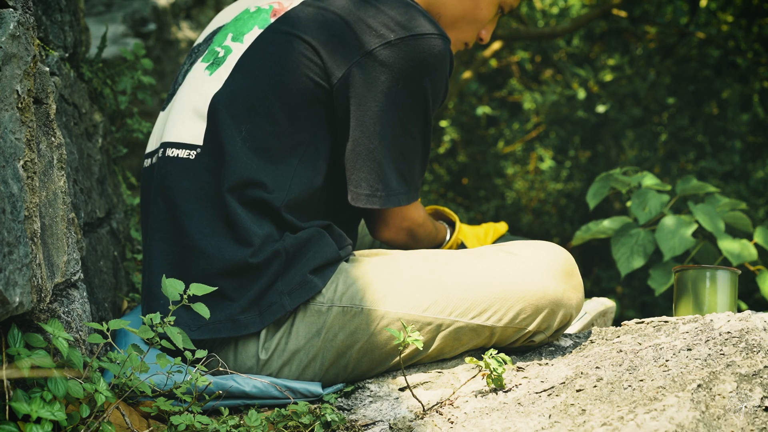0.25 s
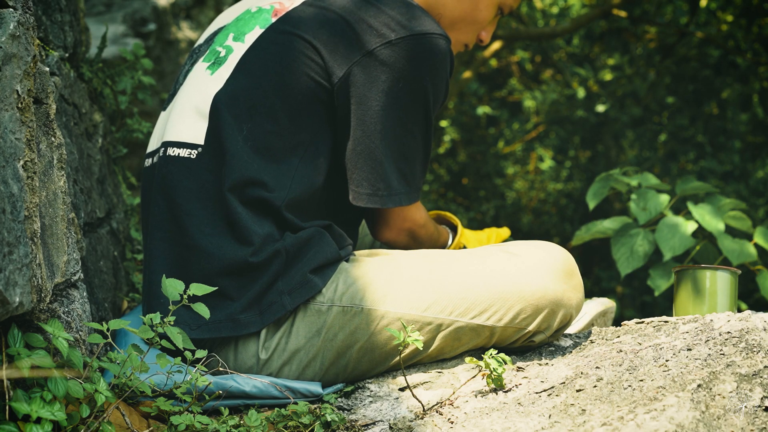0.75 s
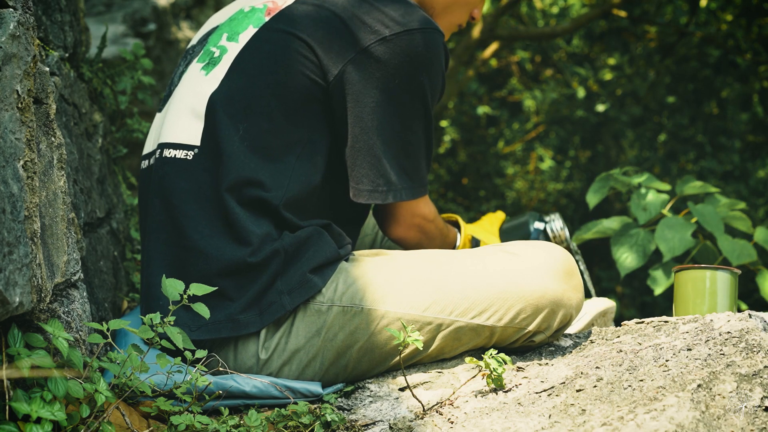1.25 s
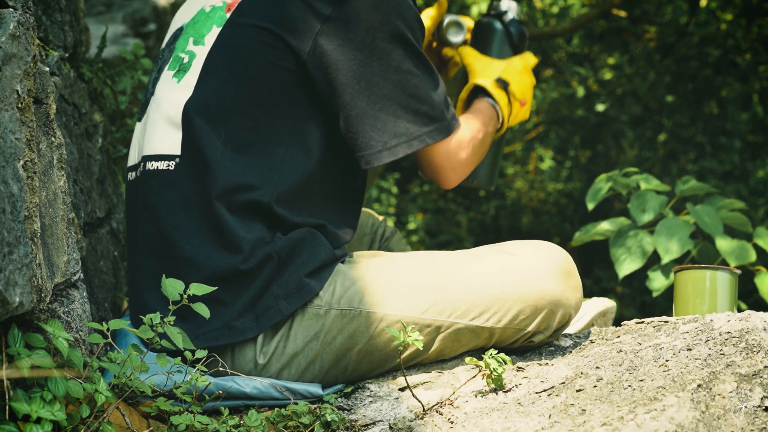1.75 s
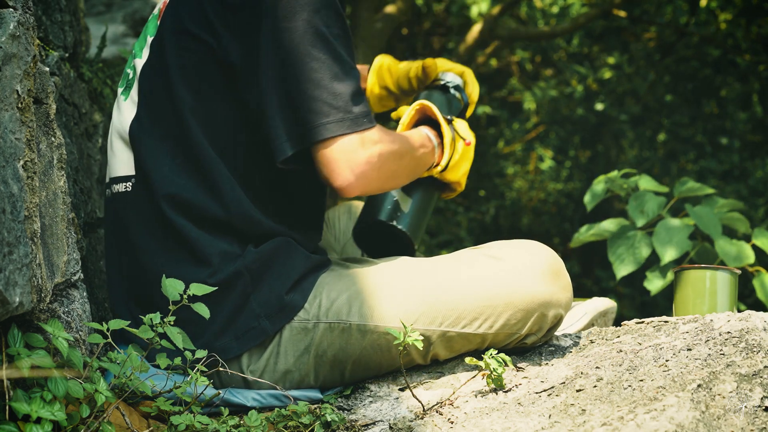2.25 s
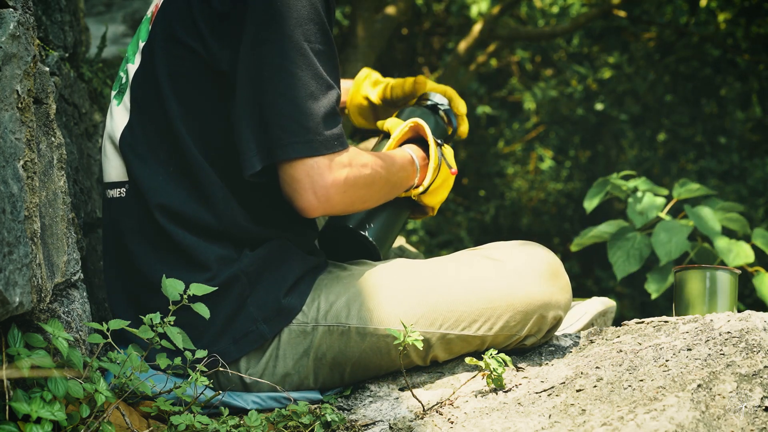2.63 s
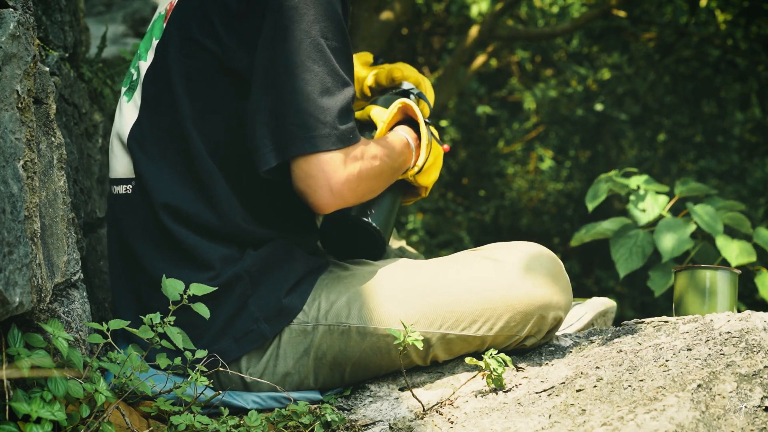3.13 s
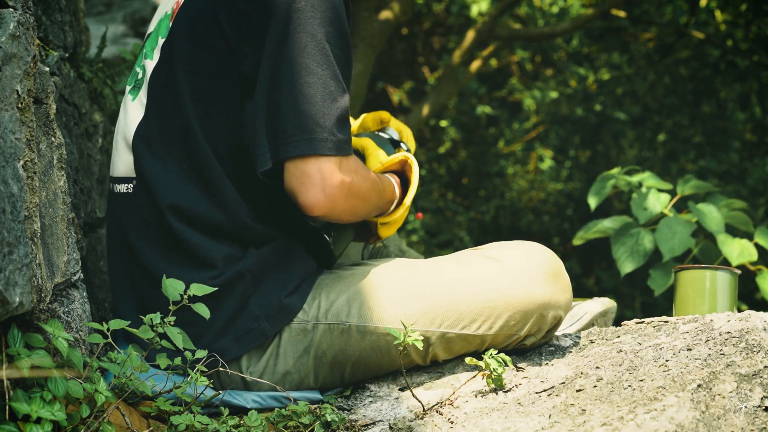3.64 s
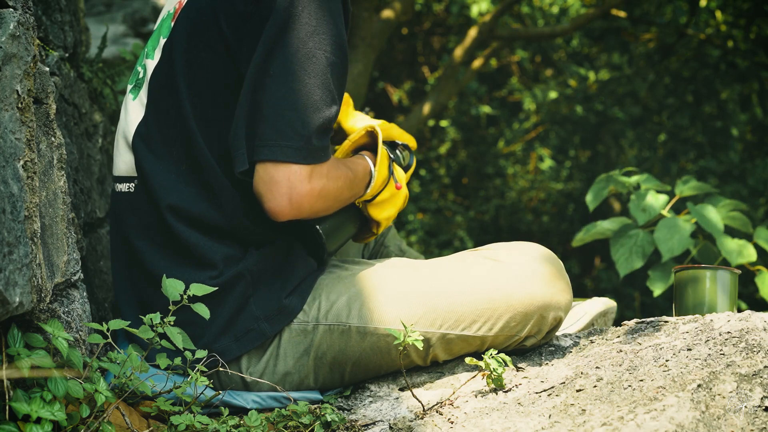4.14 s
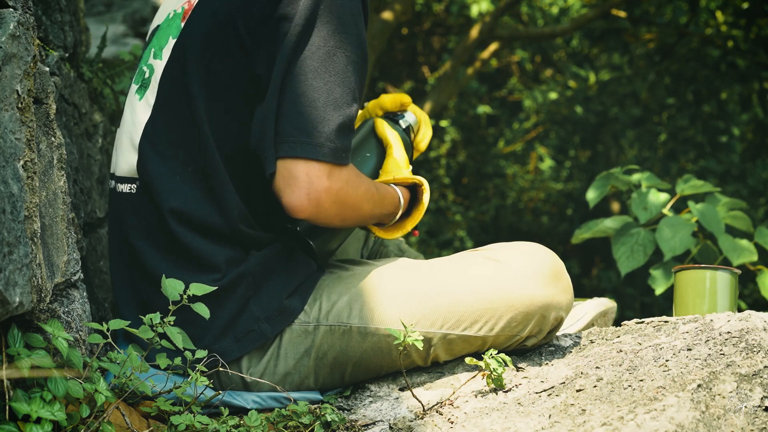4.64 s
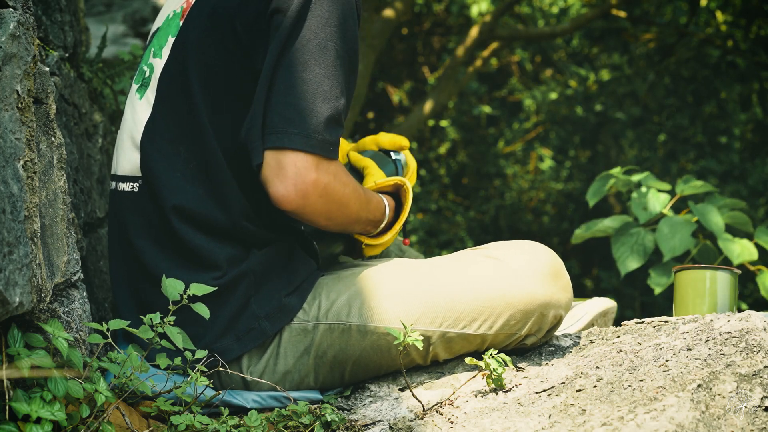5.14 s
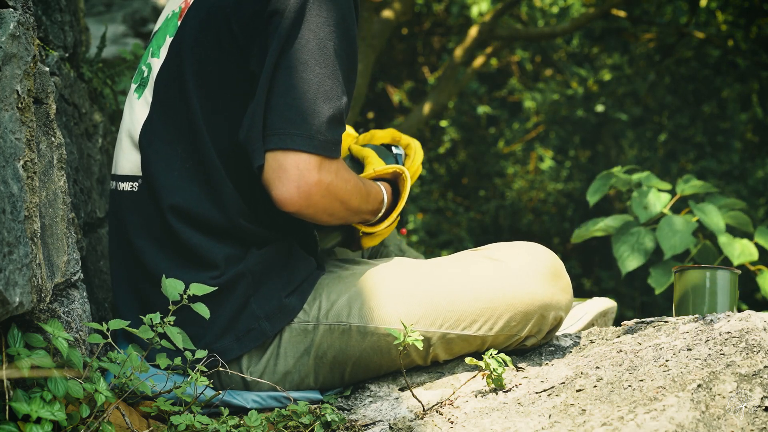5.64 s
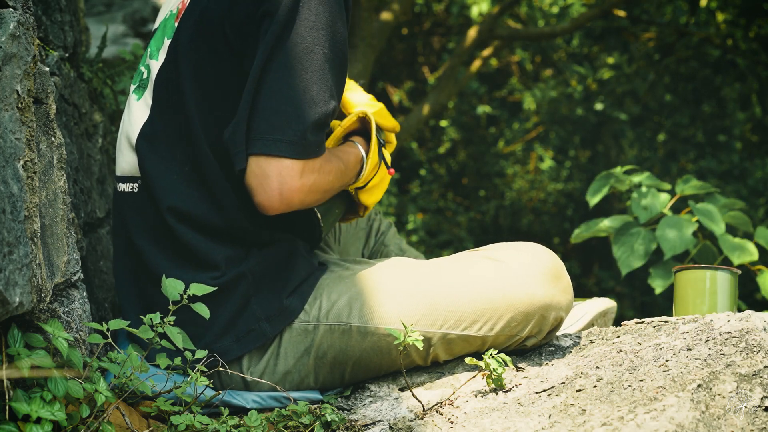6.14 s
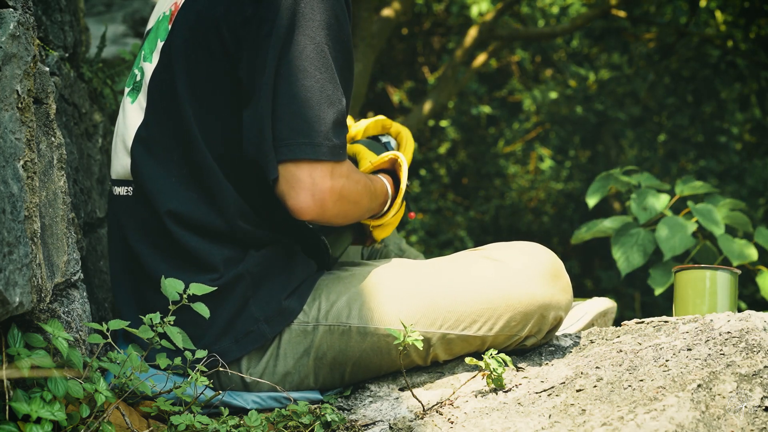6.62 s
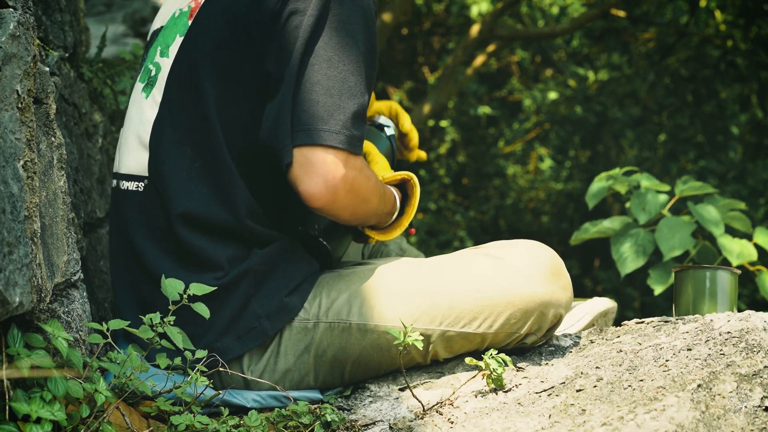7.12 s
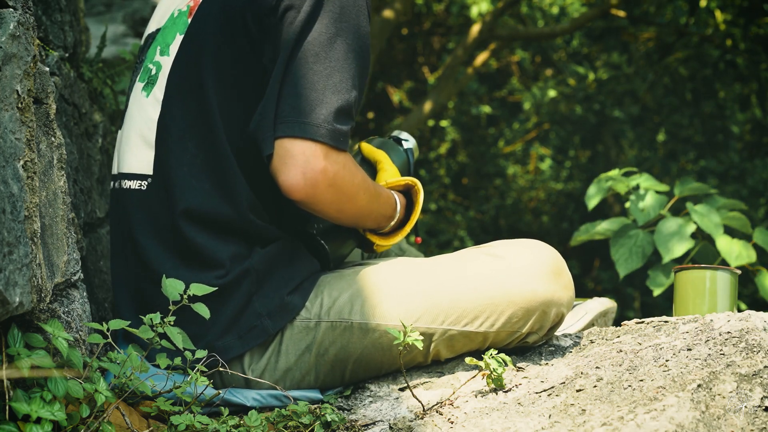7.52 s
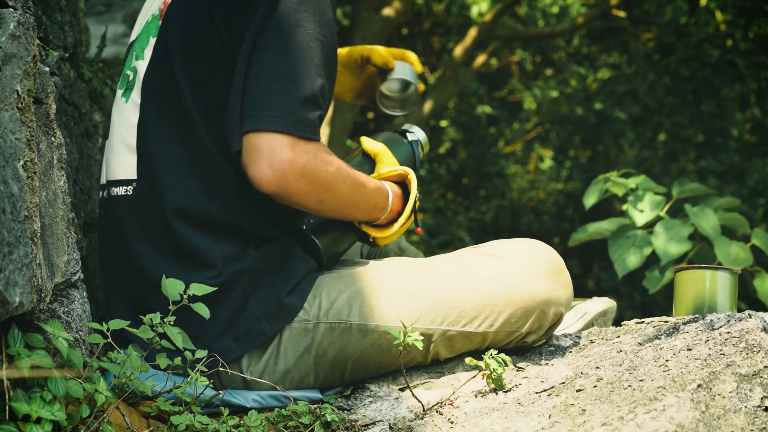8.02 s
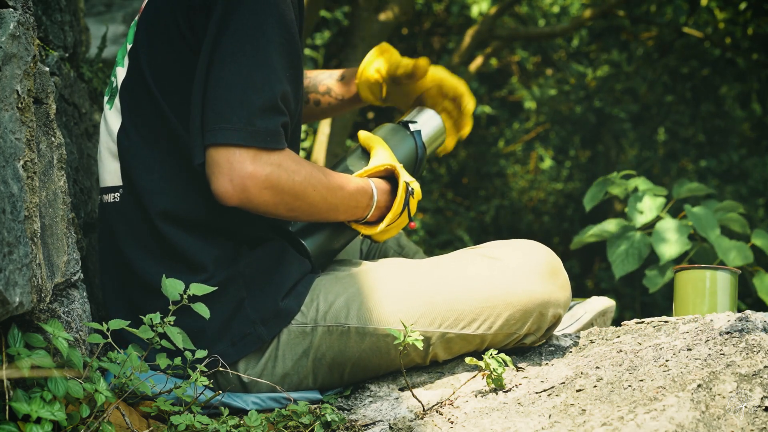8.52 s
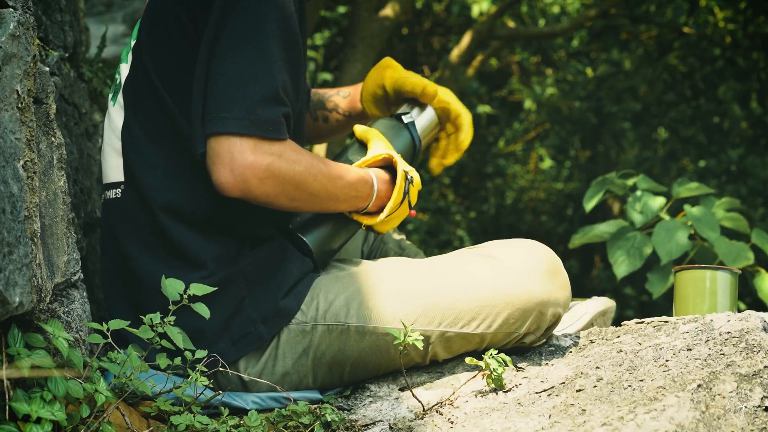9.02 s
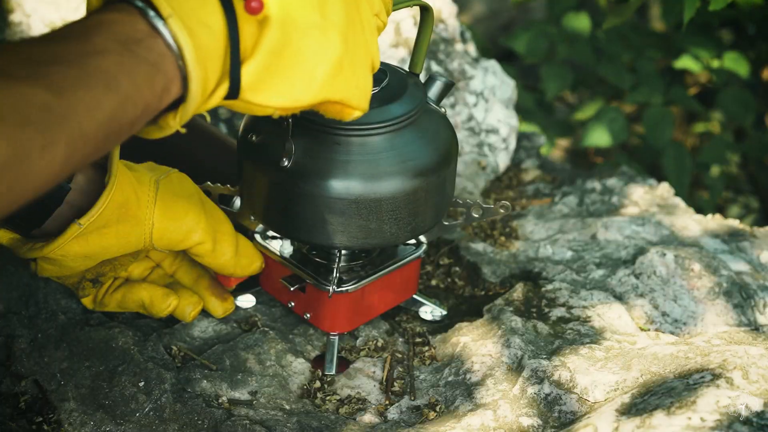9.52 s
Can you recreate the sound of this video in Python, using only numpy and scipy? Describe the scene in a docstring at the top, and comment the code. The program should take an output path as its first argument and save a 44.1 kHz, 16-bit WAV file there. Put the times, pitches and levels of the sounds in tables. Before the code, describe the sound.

Outdoors among trees, a gentle breeze hisses steadily while birds whistle and rasp at a distance. Near the microphones, thin steel clinks sharply as a lid is removed, a stopper grates round its thread with ringing squeaks, and small clicks release it. A brisk metallic rattle and a dull, solid knock close the flask; the hiss drops abruptly near the end as thin bird notes chirp.

```python
"""Steel flask at a woodland camp

Close to the microphones, gloved hands open a steel flask: the cup lid clinks off, the stopper scrapes
round in its thread and clicks free, then the cup rattles back on and is knocked home.
Steel is dying sines over a wash of noise; the thread is a swarm of tiny jerks that rings the neck.
Behind it a breeze hisses in the leaves as shaped noise, and birds call as gliding tones roughened
by noise, with dry noise chips in the trees. Faint short sine tones swell and fade."""
import sys
import numpy as np
from scipy import signal
from scipy.fft import rfft, irfft, next_fast_len
from scipy.io import wavfile
from scipy.ndimage import uniform_filter1d

SR = 44100
rng = np.random.default_rng(int(sys.argv[2]) if len(sys.argv) > 2 else 0)


def wrap_up_sound(samples):
    """Save the sound to the file named by the first command line argument, as 16-bit audio."""
    columns = np.atleast_2d(samples).T
    # keep every value between -1 and 1, then stretch to whole-number steps
    tamed = np.clip(columns, -1, 1)
    steps = np.round(tamed * 32767).astype(np.int16)
    wavfile.write(sys.argv[1], SR, steps)


N = 430857  # samples


def amp(db):
    """Decibels to gain."""
    return 10 ** (np.asarray(db) / 20)


def unit(x):
    """Scales to an rms of one."""
    return x / np.sqrt(np.mean(x ** 2) + 1e-20)


def read(points, hz):
    """Reads a table on a log-frequency axis."""
    f, value = np.transpose(points)
    return np.interp(np.log(hz + 1), np.log(f + 1), value)


def add(mix, s, sound):
    """Mixes a stereo sound in at time s."""
    part = mix[:, max(round(s * SR), 0):][:, :sound.shape[1]]
    part += sound[:, :part.shape[1]]


def fade(t, t60):
    """Exponential decay by 60 dB in t60 seconds."""
    return np.exp(-np.log(1000) * t / max(t60, 1e-3))


def ports(hz, side, balance):
    """Likeness of the left and right microphones, and their gains, at these frequencies."""
    ratio = amp(read(side, hz)) ** 2
    lean = read(balance, hz) / 2
    return (1 - ratio) / (1 + ratio), amp([lean, -lean])


# Stereo width of the near steel: (f/Hz, side over mid level/dB)
STEEL_WIDTH = [(450, -39), (800, -9.5), (1600, -13), (2600, -8.5), (5000, -1.5), (12000, -1.5)]
# Stereo lean of the near steel: (f/Hz, left over right level/dB)
STEEL_LEAN = [(450, 0.5), (900, -4.5), (1700, 0.5), (3600, 1), (6800, -1.5), (10000, -9), (15000, -6.5)]


def noise(size, spectrum, side=STEEL_WIDTH, balance=STEEL_LEAN):
    """Stereo noise of a given colour and width, rms one."""
    padded = next_fast_len(size)
    hz = np.fft.rfftfreq(padded, 1 / SR)
    a, b = rfft(rng.standard_normal((2, padded)))
    same, gains = ports(hz, side, balance)
    pair = np.array([a, same * a + np.sqrt(1 - same ** 2) * b])
    coloured = irfft(pair * gains * amp(read(spectrum, hz)), padded)
    return unit(coloured[:, :size])


def ring(modes, t, length=1):
    """Dying sines; the wider the steel at that pitch, the more out of step the two microphones."""
    out = np.zeros((2, len(t)))
    for hz, db, t60 in modes:
        same, gains = ports(hz, STEEL_WIDTH, STEEL_LEAN)
        phase = np.arccos(same) * np.array([[.5], [-.5]])
        sine = np.sin(2 * np.pi * hz * t + phase)
        out += amp(db) * gains[:, None] * sine * fade(t, t60 * length)
    return out


def woods(x, t60, top_hz):
    """Diffuse scatter from trunks and rock, duller than the direct sound."""
    t = np.arange(SR // 2) / SR
    dulling = signal.butter(1, min(top_hz, SR / 2 - 1), fs=SR)
    tail = signal.lfilter(*dulling, rng.standard_normal((2, len(t))))
    tail *= fade(t, t60) * (1 - np.exp(-t / 0.012))
    return signal.oaconvolve(x, tail / np.linalg.norm(tail[0]), axes=1)[:, :N]


# Colour of the leaf hiss before the breeze shapes it: (f/Hz, relative level/dB per Hz)
LEAF_COLOUR = [(15, -63), (25, -32), (82, -17), (228, -7), (324, -9), (392, -3.5), (486, -6.5), (527, -5),
               (604, -4), (1320, -3), (1550, -3.5), (2970, 0), (6310, -2), (14600, -13), (15800, -15)]
# Strength of the breeze: (t/s, level/dB before the share below)
BREEZE_STRENGTH = [(0, -6.5), (1.1, -4), (2.7, 0.2), (4.5, .5), (5.4, -0.5), (7.0, 2), (9.37, 3)]
# How much of that strength each pitch takes, mostly more in the treble: (f/Hz, share)
BREEZE_SHARE_BY_PITCH = [(100, 0.093), (500, 0.47), (1200, 0.36), (3000, 0.83), (9000, 1.05)]
# Stereo width of the leaves: (f/Hz, side over mid level/dB)
LEAF_WIDTH = [(60, -18), (110, -31), (200, -15), (380, -7), (700, -3.5), (1290, -2.5), (2380, 0),
              (4400, -0.5), (8120, 0.5), (15000, -2)]
# Stereo lean of the leaves: (f/Hz, left over right level/dB)
LEAF_LEAN = [(60, 4), (110, -1), (200, 0.0), (380, -1.0), (700, -1.0), (1290, -1.5), (2380, -1), (4400, 1),
             (8120, -2.5), (15000, -4)]
LEAVES_DB = -48
DROP_S, DROP_DB = 9.377, -6.5  # the hiss drops abruptly, by the share of this that each pitch takes


def leaves(patchy_db=1.5):
    """A hiss of foliage that brightens with the breeze, drifts in small patches and drops abruptly late on."""
    hiss = noise(N, LEAF_COLOUR, LEAF_WIDTH, LEAF_LEAN)
    hz, t, z = signal.stft(hiss, SR, nperseg=512, noverlap=384)
    patches = uniform_filter1d(rng.standard_normal(z.shape[1:]), size=8, axis=0)  # over pitch
    patches = unit(uniform_filter1d(patches, size=24, axis=1))  # over time
    strength_db = np.interp(t, *np.transpose(BREEZE_STRENGTH)) + DROP_DB * (t > DROP_S)
    field_db = read(BREEZE_SHARE_BY_PITCH, hz)[:, None] * strength_db + patchy_db * patches
    _, moving = signal.istft(z * amp(field_db), SR, nperseg=512, noverlap=384)
    return amp(LEAVES_DB) * moving[:, :N]


# Faint, short, mostly low tones: (t/s at the middle, length/s, f/Hz, level/dB)
SOFT_TONES = [(.285, 0.034, 758, -56), (1.04, 0.057, 775, -60), (1.635, 0.024, 238, -56),
              (2.55, 0.073, 1670, -57), (3.272, 0.041, 568, -52), (3.785, .06, 507, -60.5),
              (4.395, 0.06, 505, -58.5), (4.71, 0.047, 457, -61.5)]


def tones():
    """Faint rounded sine notes that swell and fade."""
    out = np.zeros((2, N))
    for s, length, hz, db in SOFT_TONES:
        t = np.arange(-length, length, 1 / SR)
        swell = np.exp(-(2 * t / length) ** 2)
        note = amp(db) * np.sqrt(2) * np.sin(2 * np.pi * hz * t) * swell
        add(out, s - length, np.array([note, note]))
    return out


def voice(pitch, rough, fuzz_hz=230, flutter=0.013):
    """A whistle with a quick random tremor; when hoarse, the tone breaks into a narrow band of noise."""
    slow = signal.butter(2, fuzz_hz, fs=SR)
    a, b = signal.lfilter(*slow, rng.standard_normal((2, 4, SR // 2)))[..., :len(pitch)]
    turn = np.exp(2j * np.pi * np.cumsum(pitch * (1 + flutter * unit(a[-1]))) / SR)
    fuzz = ((a + 1j * b) * turn).real
    husky = unit(fuzz[:2] + fuzz[2])  # the shared part draws left and right together
    rough = np.clip(rough, 0, 1)
    return unit((1 - rough) * unit(turn.real) + rough * husky)


def slur(s, length, hz, db, oct_per_s, rough):
    """One note that glides evenly while it swells and fades; gives its start time and sound."""
    t = np.arange(-.15, .15, 1 / SR)
    call = voice(hz * 2 ** (oct_per_s * t), rough)
    return s + t[0], call * amp(db) * np.exp(-2 * (t / length) ** 2)


# A hoarse bird repeats one upward slur: (t/s at the middle, f/Hz at the middle, level/dB)
HOARSE_SLURS = [(2.87, 3980, -43), (5.712, 3680, -45), (6.47, 3590, -42.5), (7.125, 3560, -47),
                (7.28, 3770, -44)]
HOARSE_S, HOARSE_OCT_PER_S = 0.067, 3.4
# Which of those slurs a quick downward one follows: (row number from 0)
ANSWERED_SLURS = (0, 1, 4)
ANSWER_AFTER_S, ANSWER_S = .128, 0.056
ANSWER_HZ, ANSWER_DB, ANSWER_OCT_PER_S = 3540, -46.5, -7
# Thin notes of distant birds: (t/s at the middle, length/s, f/Hz, level/dB, glide/octaves per s)
THIN_NOTES = [(4.765, 0.019, 3760, -48.5, -1.6), (9.405, .028, 5350, -50, -5),
              (9.462, 0.033, 5230, -48.5, 2), (9.498, 0.035, 3020, -50.5, -1), (9.51, .04, 5100, -49.5, -2),
              (9.585, 0.076, 4390, -53, -1.8), (9.577, .07, 2770, -56, -.5)]


def far_birds():
    """The hoarse bird's rising slurs and falling answers, and thin notes from farther off."""
    out = np.zeros((2, N))
    for s, hz, db in HOARSE_SLURS:
        add(out, *slur(s, HOARSE_S, hz, db, HOARSE_OCT_PER_S, rough=0.77))
    for k in ANSWERED_SLURS:
        s = HOARSE_SLURS[k][0] + ANSWER_AFTER_S
        add(out, *slur(s, ANSWER_S, ANSWER_HZ, ANSWER_DB, ANSWER_OCT_PER_S, rough=0.76))
    for row in THIN_NOTES:
        add(out, *slur(*row, rough=0.69))
    return out


# Thin dry chips up in the trees: (t/s, level/dB, t60/s)
TREE_CHIPS = [(1.115, -51, 0.15), (1.193, -49.5, 0.21), (1.262, -53, 0.18), (1.477, -45, .14)]
# Their colour: (f/Hz, relative level/dB per Hz)
TREE_CHIP_COLOUR = [(1000, -50), (3800, -22), (4700, -3), (5600, 0), (6400, -4), (7500, -16), (16000, -40)]


def chips():
    """Short high rasps of noise that fade quickly."""
    out, t = np.zeros((2, N)), np.arange(SR // 4) / SR
    for s, db, t60 in TREE_CHIPS:
        rasp = noise(len(t), TREE_CHIP_COLOUR)
        add(out, s, amp(db) * rasp * fade(t, t60) * (1 - np.exp(-t / .002)))
    return out


# Falling whistles of a near bird:
# (t/s at the break, break/s, f/Hz before it, f/Hz after it, level/dB, fade/s)
NEAR_WHISTLES = [(.729, 0.0028, 5620, 3840, -37, .062), (3.361, 0.0061, 6100, 3064, -38, 0.042)]
LOUDEST_S, SWELL_DB_PER_S = 0.012, 400  # loudest time is counted from the break
SAG_S, REST_HZ = .053, 1746  # after the break the pitch sinks towards a resting pitch
ACCENT_DB, ACCENT_S = 5, 0.0038  # brief accent at the loudest time


def whistles(rough=.15, rough_start=0.68, husk_db=-14, husk_above=1.2):
    """Each starts high and hoarse, breaks downward, then sags and fades; a husk lies just above the tone."""
    out, t = np.zeros((2, N)), np.arange(-.026, .15, 1 / SR)
    for s, break_s, high_hz, low_hz, db, fade_s in NEAR_WHISTLES:
        broken = (1 + np.tanh(t / (2 * break_s))) / 2
        sagging_hz = REST_HZ + (low_hz - REST_HZ) * np.exp(-t / SAG_S)
        pitch = high_hz * (1 - broken) + sagging_hz * broken
        late = t - LOUDEST_S
        accent_db = ACCENT_DB * np.exp(-(late / ACCENT_S) ** 2)
        level_db = db + SWELL_DB_PER_S * np.minimum(late, 0) + accent_db
        level = amp(level_db) * np.exp(-(np.maximum(late, 0) / fade_s) ** 2)
        call = voice(pitch, rough_start + (rough - rough_start) * broken)
        call = call + amp(husk_db) * voice(pitch * husk_above, 1, fuzz_hz=500)
        add(out, s + t[0], call * level * signal.windows.tukey(len(t), .1))
    return out


# Rubs of the glove, turns of the stopper, and two dry ticks as of a twig (0.928 s and 1.315 s):
# (t/s at the middle, length/s, level/dB, share of ringing 0-1)
RUBS_TURNS_AND_TICKS = [(0.287, 0.048, -53.5, 0.08), (0.928, 0.0059, -42.5, 0.05), (1.315, .004, -50, 0.1),
                        (1.512, .04, -50.5, 0), (2.952, .05, -45, 0.26), (3.038, 0.085, -42.5, 0.47),
                        (3.123, 0.047, -49.5, 0.25), (3.56, 0.046, -51.5, 0.6), (4.321, 0.13, -47, 0.07),
                        (4.386, 0.036, -43, 0.13), (4.69, 0.063, -46.5, 0), (5.952, 0.064, -36, 0.28),
                        (6.472, 0.1, -45.5, 0.55), (6.525, 0.11, -42, 0.22), (6.972, 0.092, -46.5, 0.32),
                        (7.291, 0.99, -51.5, 0.01), (7.635, 0.086, -43, 0.43), (7.738, 0.086, -49, 0.04),
                        (8.93, .05, -49, 0.04), (9.156, 0.059, -50.5, 0.7), (9.297, 0.075, -44.5, 0.1)]
# Ringing of the neck: (f/Hz, relative level/dB, t60/s)
NECK_MODES = [(487, -11, 0.23), (929, -4.5, 0.2), (1562, 4.5, 0.04), (1634, 4, 0.052), (2936, 2, 0.099),
              (3180, -6, 0.054), (3820, 4, 0.045), (6620, 1.5, 0.046), (7300, -6, 0.046), (10800, -3, .04)]
# Colour of the rasp: (f/Hz, relative level/dB per Hz)
RASP_COLOUR = [(200, -43), (800, -9.5), (1600, -4), (2200, -3.5), (3400, 2.5), (5000, -9.5), (7000, -6),
               (9000, -13), (16000, -16)]


def scrapes(slips_per_s=900, grain=0.55):
    """The thread sticks and slips: tiny jerks ring the neck; rubs and ticks are mostly the grainy rasp."""
    out, t = np.zeros((2, N)), np.arange(SR // 4) / SR
    neck = ring(NECK_MODES, t)
    neck /= np.linalg.norm(neck[0])
    time = np.arange(SR // 2) / SR - 1 / 4
    for s, length, db, share in RUBS_TURNS_AND_TICKS:
        stroke = np.exp(-4 * (time / length) ** 2)
        slipping = rng.random(len(time)) < slips_per_s / SR
        slips = unit(rng.standard_normal(len(time)) * slipping)
        bite = unit(signal.lfilter([1], [1, -np.exp(-1 / (0.002 * SR))], abs(slips)))
        rasp = noise(len(time), RASP_COLOUR) * unit(1 - grain + grain * bite) * stroke
        tone = signal.fftconvolve((slips * stroke)[None], neck, axes=1)[:, :len(time)]
        share = np.clip(share, 0, 1)
        add(out, s - 1 / 4, amp(db) * (np.sqrt(1 - share) * rasp + np.sqrt(share) * tone))
    return out


def hollow(rows, rise):
    """Low resonances of a vessel that build up over rise seconds and die away."""
    out, t = np.zeros((2, N)), np.arange(SR // 3) / SR
    for s, hz, db, t60 in rows:
        add(out, s, ring([(hz, db, t60)], t) * (1 - np.exp(-t / max(rise, 1e-4))))
    return out


# The neck of the flask sings on after a firm turn: (t/s, f/Hz, level/dB, t60/s)
NECK_SONG = [(5.953, 913, -37, 0.23), (6.462, 922, -44.5, 0.23), (7.595, 1254, -40, 0.25)]


def neck_rings():
    """Single tones of the neck, each a dying sine."""
    return hollow(NECK_SONG, rise=0.0045)


def rebounds(hits, gap_s, loss_db, brighter_db, length, count=1):
    """Loose steel chatters: each blow is followed by weaker, brighter contacts."""
    return [(s + k * gap_s, db - k * loss_db, treble_db + k * brighter_db, held * length ** k)
            for s, db, treble_db, held in hits for k in range(count + 1)]


def clinks(hits, modes, wash, wash_db, wash_t60, rise, count=110):
    """Each blow rings strong modes and a crowd of weak ones; the glove sets how long the ring lasts."""
    out, t = np.zeros((2, N)), np.arange(SR // 2) / SR
    hz = np.linspace(np.sqrt(100), np.sqrt(16000), count) ** 2
    uneven_db, cluster_db, grip = 1.8, 4.0, .0015  # grip: spread of pitch as a ratio
    for s, db, treble_db, length in hits:
        # the spot that is struck favours some modes over others; the grip bends them a little
        struck = [(f * (1 + grip * rng.standard_normal()), level + uneven_db * rng.standard_normal(), t60)
                  for f, level, t60 in modes]
        cluster_levels = read(wash, hz) + cluster_db * np.clip(rng.standard_normal(count), -2, 2)
        crowd = noise(len(t), np.transpose([hz, cluster_levels])) * fade(t, wash_t60 * length)
        blow = ring(struck, t, length) + amp(wash_db) * crowd
        blow *= 1 - np.exp(-t / max(rise, 1e-5))
        dull = signal.lfilter(*signal.butter(1, 4500, fs=SR), blow)
        add(out, s, amp(db) * (dull + amp(treble_db) * (blow - dull)))
    return out


# Blows on the stopper: (t/s, level/dB, treble level/dB, ring length as a factor)
STOPPER_BLOWS = [(4.385, -47, -5, .2), (7.5328, -32.5, -9, 0.28), (7.556, -36.5, -7, 0.86),
                 (7.619, -44, -13, 0.84), (7.631, -42, -10, 0.33), (7.656, -43, -6, 0.27),
                 (9.3005, -46, 11, 0.25)]
# Its strong modes: (f/Hz, relative level/dB, t60/s at factor 1)
STOPPER_RING = [(1242, -14, .35), (1647, -2.5, 0.22), (2440, -2, 0.14), (2790, -13, .12), (3160, -6, .08),
                (3940, 3, 0.19), (4370, -8.5, 0.36), (4650, -11, 0.4)]
# Its weak, close modes: (f/Hz, relative level/dB per Hz)
STOPPER_CROWD = [(200, -17.5), (1200, -9), (2000, -13), (2600, -8), (3300, -1), (4600, -9), (5500, -11),
                 (16000, -23)]


def stopper_clicks():
    """Clicks of the stopper as ringing modes."""
    hits = rebounds(STOPPER_BLOWS, gap_s=.0032, loss_db=10.5, brighter_db=3, length=2.4)
    return clinks(hits, STOPPER_RING, STOPPER_CROWD, wash_db=2, wash_t60=0.17, rise=0.00045)


# Blows on the rim: (t/s, level/dB, treble level/dB, ring length as a factor)
RIM_BLOWS = [(2.1698, -15.5, -1.5, 1.11), (2.215, -37.5, -1, 2.8)]
# Its strong modes: (f/Hz, relative level/dB, t60/s at factor 1)
RIM_RING = [(410, -35, 0.28), (916, -23.5, 0.57), (1548, -9, 0.081), (1874, 3.5, 0.067), (1950, -15, .07),
            (3020, -14, 0.22), (3140, -14, 0.12), (3510, -17, 0.11), (4000, -13, .1), (4630, -8, .07),
            (6724, 1.5, 0.055), (6800, -16, .09), (10700, -34, 0.2)]
# The crowd of weak, close modes of thin steel: (f/Hz, relative level/dB per Hz)
RIM_CROWD = [(150, -30), (700, -50), (1200, -16), (1800, 9.5), (2300, -5), (3300, 1.5), (4500, -6.5),
             (5500, -17), (6800, -4), (8200, -25), (16000, -28)]


def rim_clinks():
    """The rim is struck and chatters, ringing its thin steel."""
    hits = rebounds(RIM_BLOWS, gap_s=.0029, loss_db=7, brighter_db=5.5, length=0.92, count=2)
    return clinks(hits, RIM_RING, RIM_CROWD, wash_db=-1.5, wash_t60=0.08, rise=0.001)


# Blows on the flask: (t/s, level/dB, treble level/dB, ring length as a factor)
FLASK_BLOWS = [(2.2497, -25.5, 3, .9), (2.2648, -16, -1, 0.82), (2.3182, -22.5, 5, 0.65)]
# Its strong modes: (f/Hz, relative level/dB, t60/s at factor 1)
FLASK_RING = [(445.3, -26.5, 0.29), (913, -27, 0.51), (968, -12, 0.076), (1635, -0.5, 0.047),
              (1700, -0.5, 0.077), (2780, -5, 0.085), (2942, -11, 0.093), (3270, -17, .07),
              (3400, -11, .08), (4752, -14, .09), (6940, -16, 0.14), (10720, -21, .07), (12830, -23, 0.11)]
# The crowd of weak, close modes of thin steel: (f/Hz, relative level/dB per Hz)
FLASK_CROWD = [(150, -28), (700, -37), (1000, -3), (1250, -15), (1700, 8.5), (2300, -11), (3400, 2.5),
               (5000, -11.5), (7000, -11), (8300, -16), (16000, -19)]


def flask_clinks():
    """The flask is struck and rings its own modes."""
    hits = rebounds(FLASK_BLOWS, gap_s=.0135, loss_db=15, brighter_db=7, length=1.5)
    return clinks(hits, FLASK_RING, FLASK_CROWD, wash_db=-0.5, wash_t60=0.1, rise=0.00066)


# Blows on the cup: (t/s, level/dB, treble level/dB, ring length as a factor)
CUP_BLOWS = [(8.2522, -21, 0.5, 0.64), (8.2774, -12.5, -1.5, 0.98), (8.365, -41, 4, .7),
             (8.3728, -20.5, -2, 0.78), (8.398, -32.5, 9, 0.62), (8.4065, -23.5, 1, 0.76),
             (8.4178, -15, 2, 0.73), (8.565, -37.5, 2.5, 0.84)]
# Its strong modes: (f/Hz, relative level/dB, t60/s at factor 1)
CUP_RING = [(471, -23, 0.2), (510, -29, 0.16), (1575, -9.5, 0.1), (1636, 2, 0.097), (1740, -25, 0.11),
            (2445, -11, 0.071), (2840, -14, 0.19), (3250, -5, 0.049), (3500, -6, 0.062), (3880, -11, .09),
            (3940, -8, .07), (4480, -24, 0.24), (5540, -13, 0.12), (5790, -28, 0.87), (6370, -20, 0.14),
            (6750, -13, 0.25), (6730, -21, 0.11), (9500, -11, .09), (9700, -15, .07), (11250, -19, .08),
            (11700, -23, 0.28), (13800, -26, .12)]
# The crowd of weak, close modes of thin steel: (f/Hz, relative level/dB per Hz)
CUP_CROWD = [(150, -30.5), (600, -14.5), (1100, -15.5), (1600, -9), (2000, -5.5), (3400, -1.5),
             (4800, -3.5), (7000, -1.5), (8300, -19), (9700, -4), (16000, -13)]


def cup_rattle():
    """The cup rattles back on, ringing at each contact."""
    hits = rebounds(CUP_BLOWS, gap_s=.0068, loss_db=7, brighter_db=2.0, length=1.11)
    return clinks(hits, CUP_RING, CUP_CROWD, wash_db=0.0, wash_t60=.12, rise=.0012)


# Blows as the cup seats: (t/s, level/dB, treble level/dB, ring length as a factor)
SEAT_BLOWS = [(8.8437, -25.5, 1, 0.63), (8.8463, -17.5, -2.5, 0.69), (8.8492, -11, -3.5, .45)]
# Strong modes of the seated cup: (f/Hz, relative level/dB, t60/s at factor 1)
SEAT_RING = [(1450, -6, .016), (1695, -2, 0.024), (2010, 2, 0.015), (2350, -16, 0.015), (3740, -4.5, 0.028)]
# The crowd of weak, close modes of thin steel: (f/Hz, relative level/dB per Hz)
SEAT_CROWD = [(100, -29), (280, -10.5), (900, -12), (1200, -13), (1900, 6.5), (2800, -10), (3800, -8),
              (6000, -12), (9000, -23), (16000, -21)]
# The air shut in the cup booms as it seats: (t/s, f/Hz, level/dB, t60/s)
AIR_BOOMS = [(8.8495, 462, -23, .11), (8.8505, 540, -29, 0.042), (8.8495, 290, -25, 0.029),
             (8.8495, 890, -26.5, 0.058)]


def cup_seating():
    """The cup is knocked home: short-lived modes, and a boom of the air shut inside."""
    hits = rebounds(SEAT_BLOWS, gap_s=.007, loss_db=19, brighter_db=9, length=3.0, count=2)
    knock = clinks(hits, SEAT_RING, SEAT_CROWD, wash_db=3.0, wash_t60=0.024, rise=0.00029)
    return knock + hollow(AIR_BOOMS, rise=0.0023)


def scene():
    """Near, almost dry steel in front of the birds and leaves."""
    song = far_birds() + chips() + whistles()
    steel = scrapes() + neck_rings() + stopper_clicks()
    steel = steel + rim_clinks() + flask_clinks() + cup_rattle() + cup_seating()
    # the steel is kept out of the deep bass
    steel = signal.sosfilt(signal.butter(2, 170, "high", fs=SR, output="sos"), steel)
    steel_scatter = amp(-29.0) * woods(steel, t60=0.66, top_hz=5000)
    song_scatter = amp(-8.5) * woods(song, t60=0.15, top_hz=7000)
    return leaves() + tones() + song + song_scatter + steel + steel_scatter


EDGE_HZ = 15950


def record(dry):
    """The recorder's band limit."""
    low_pass = signal.firwin(511, EDGE_HZ, window=("kaiser", 9), fs=SR)
    return signal.oaconvolve(dry, low_pass[None], "same", axes=1)


dry = scene()
out = record(dry)
wrap_up_sound(out)
```